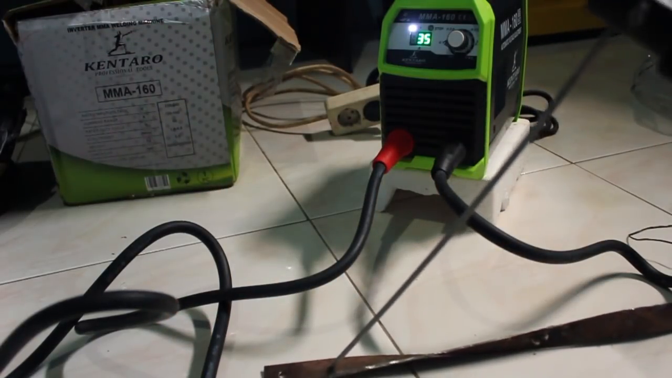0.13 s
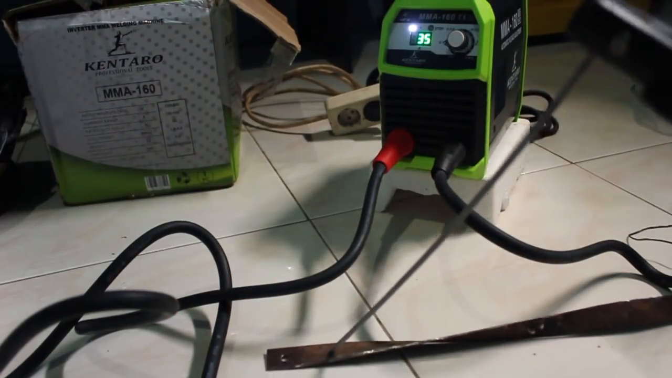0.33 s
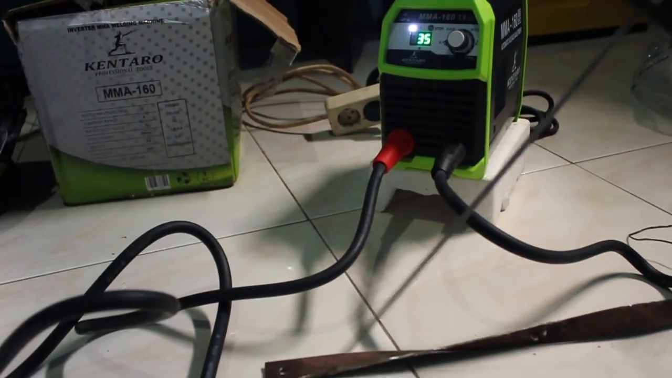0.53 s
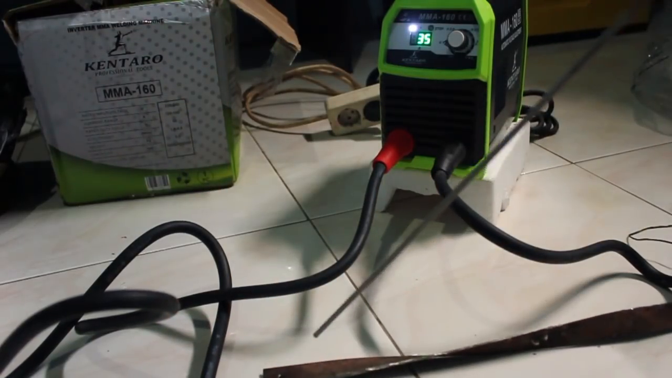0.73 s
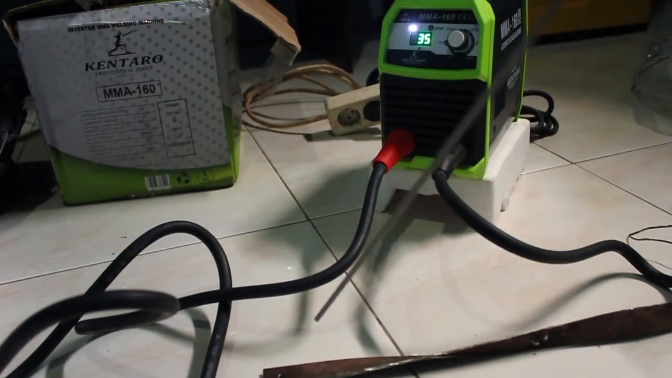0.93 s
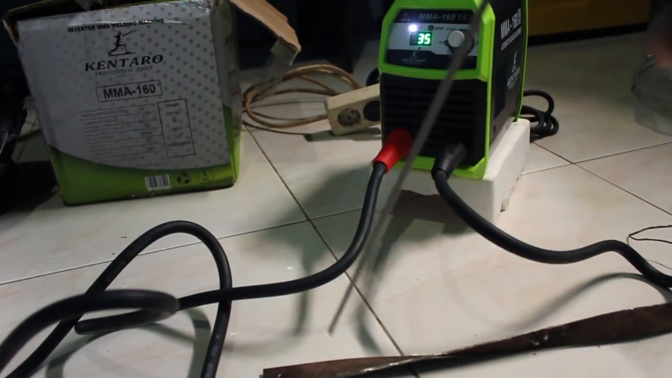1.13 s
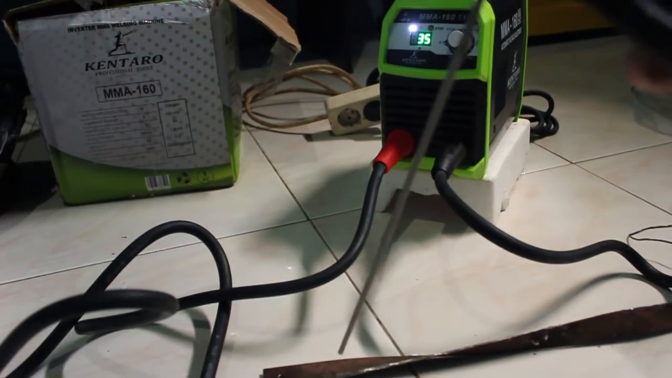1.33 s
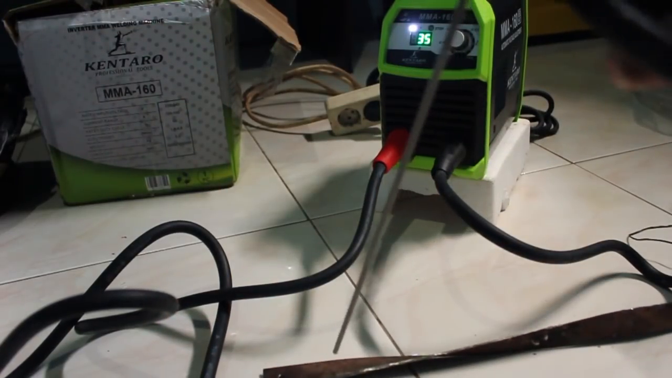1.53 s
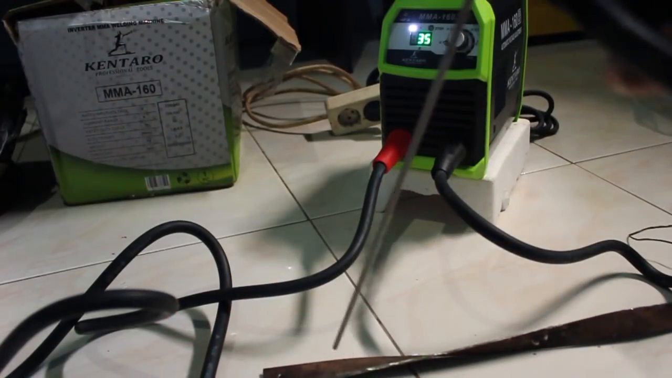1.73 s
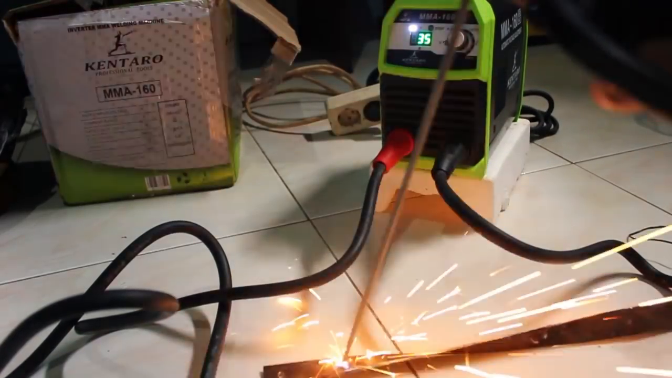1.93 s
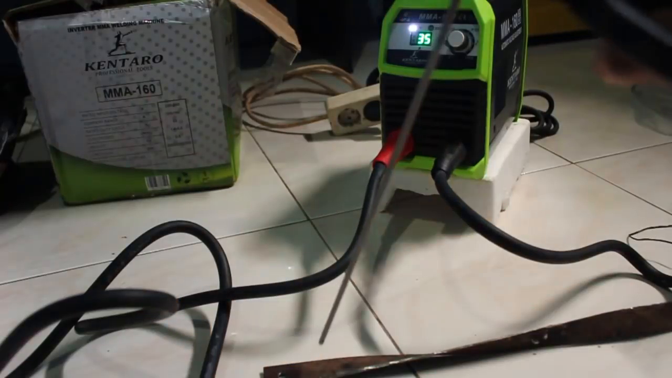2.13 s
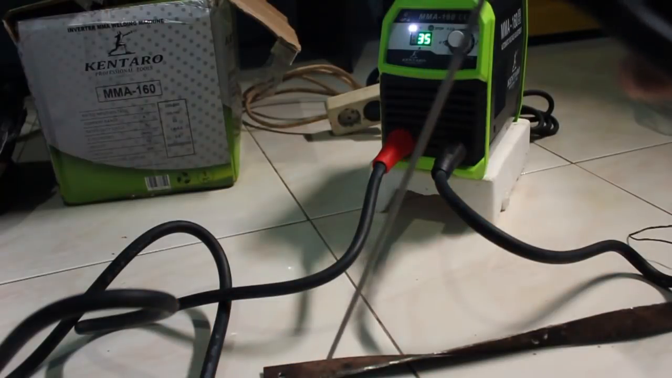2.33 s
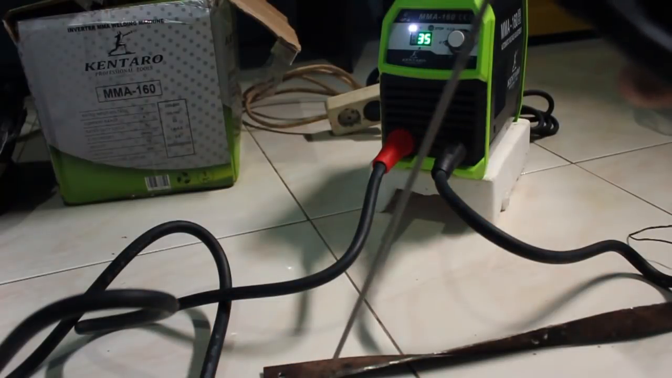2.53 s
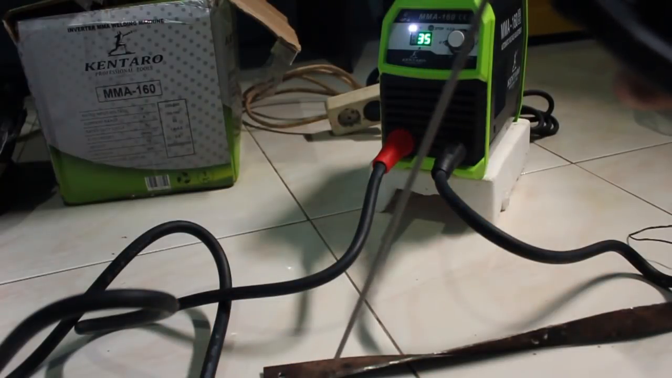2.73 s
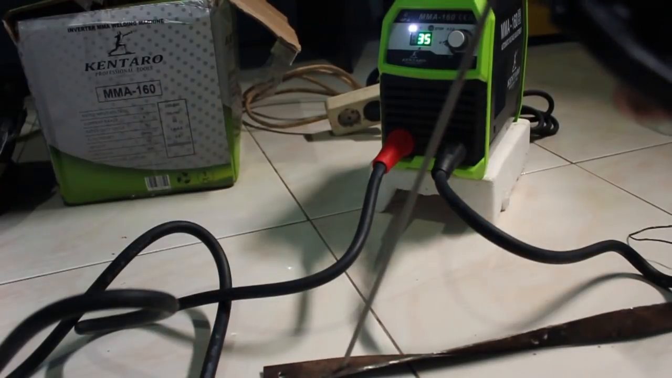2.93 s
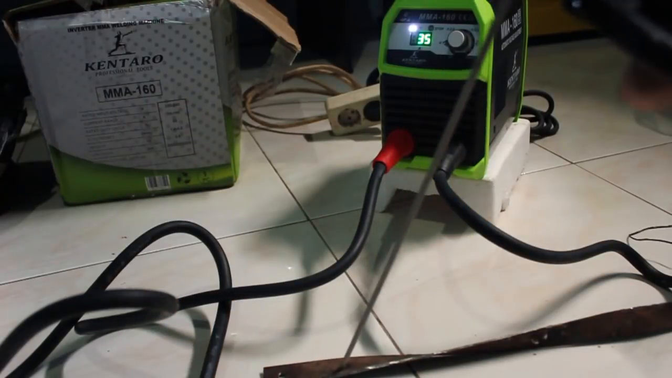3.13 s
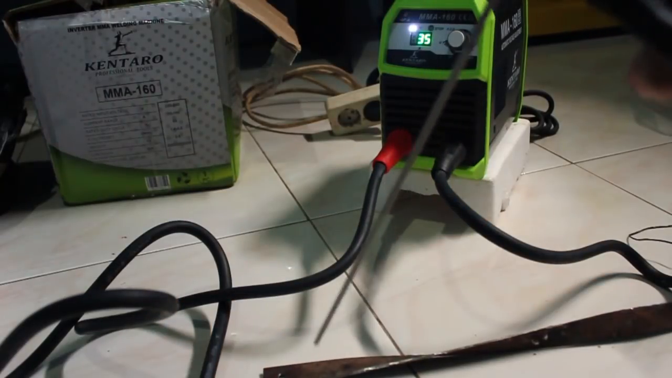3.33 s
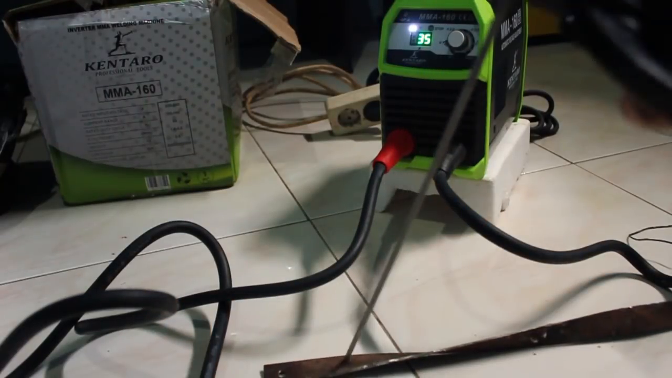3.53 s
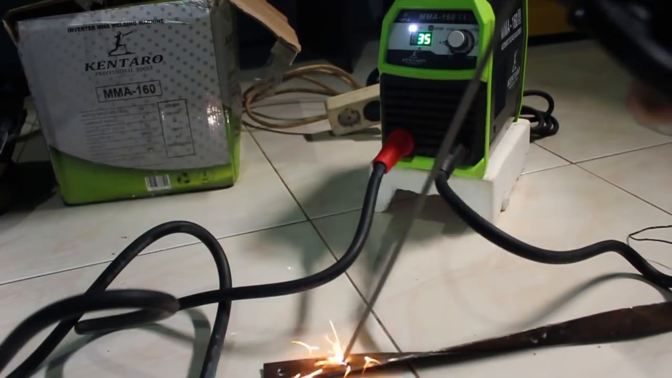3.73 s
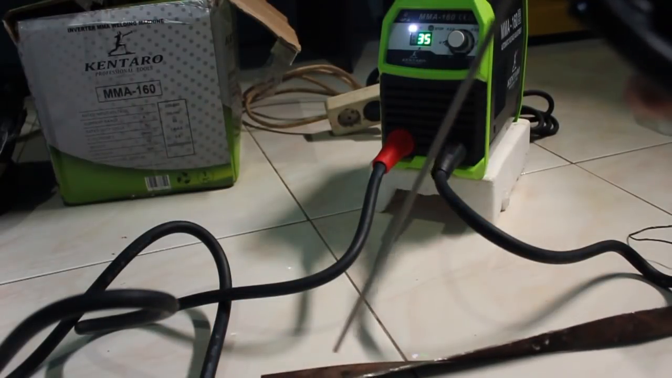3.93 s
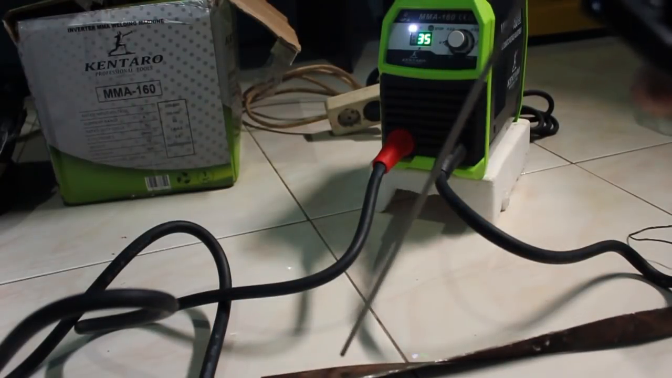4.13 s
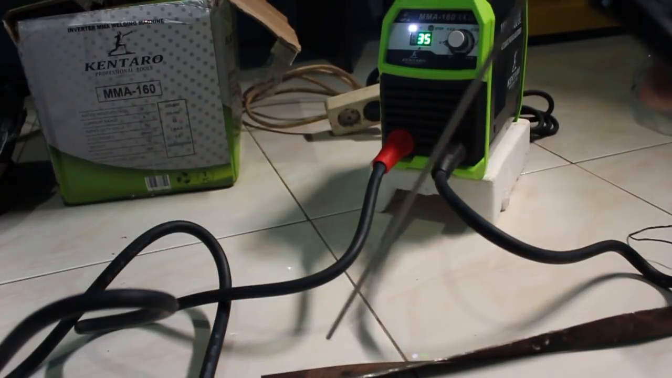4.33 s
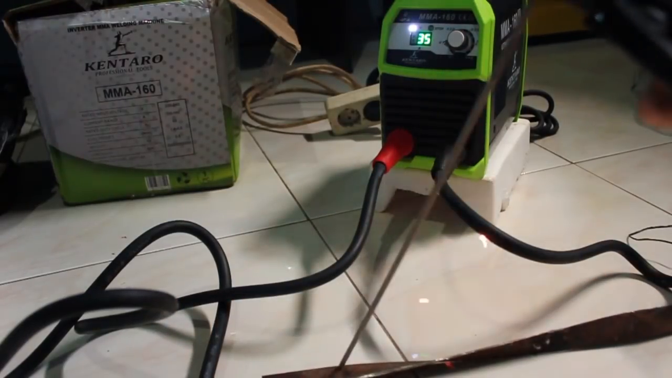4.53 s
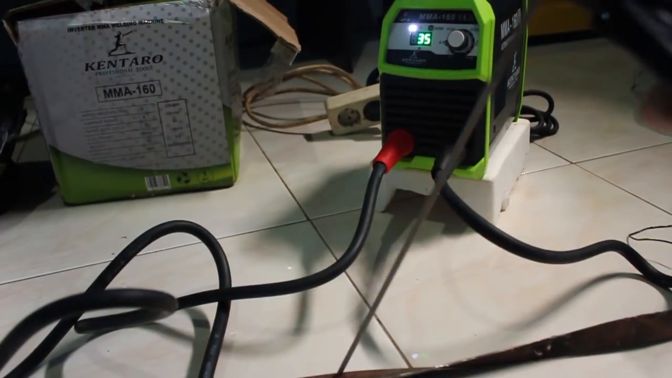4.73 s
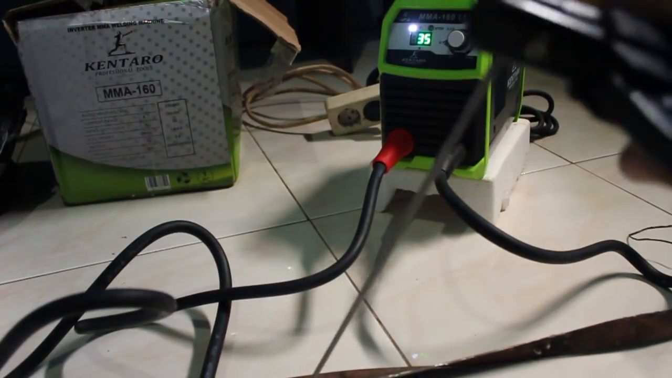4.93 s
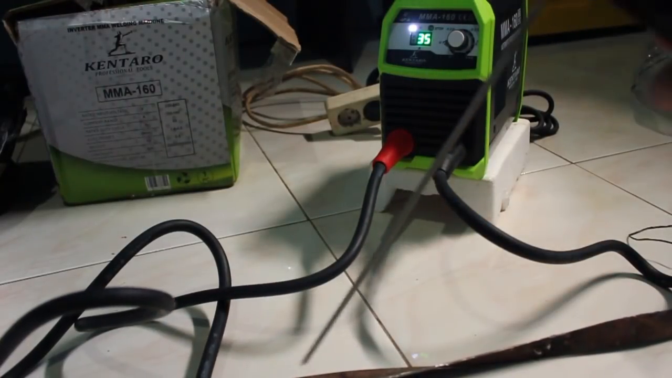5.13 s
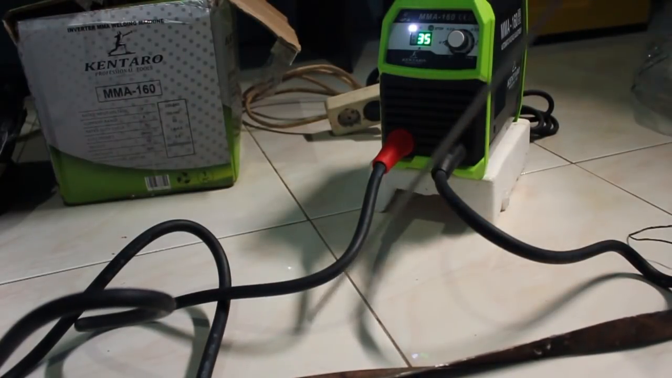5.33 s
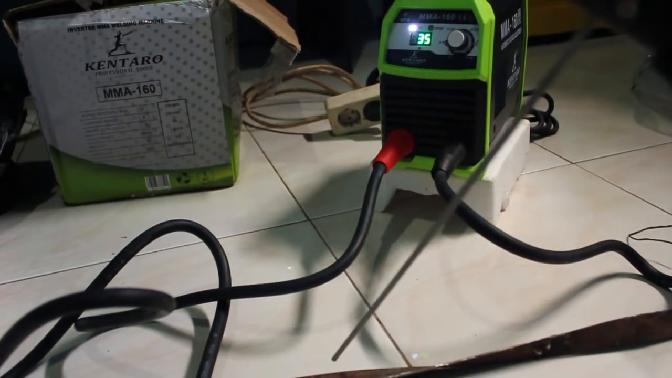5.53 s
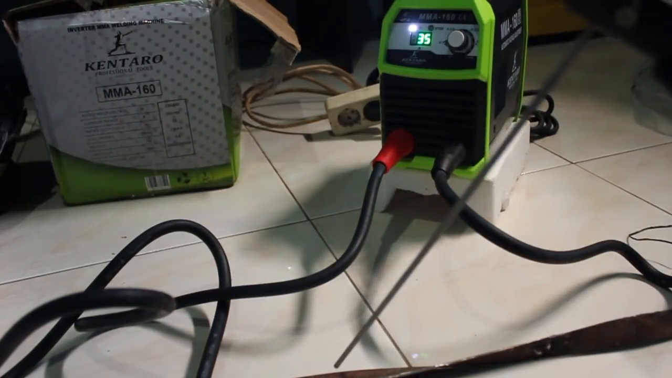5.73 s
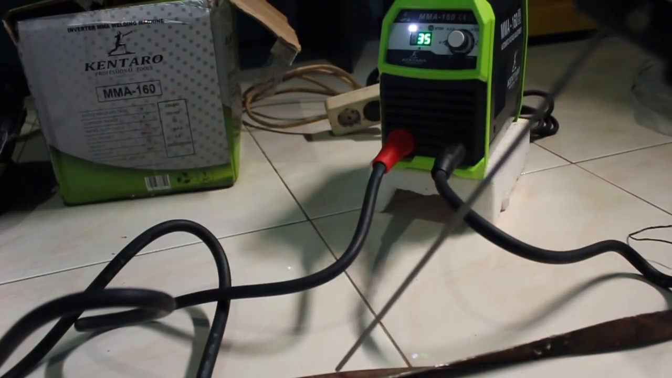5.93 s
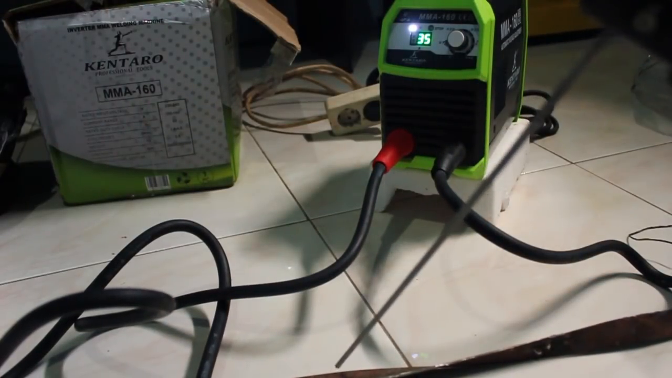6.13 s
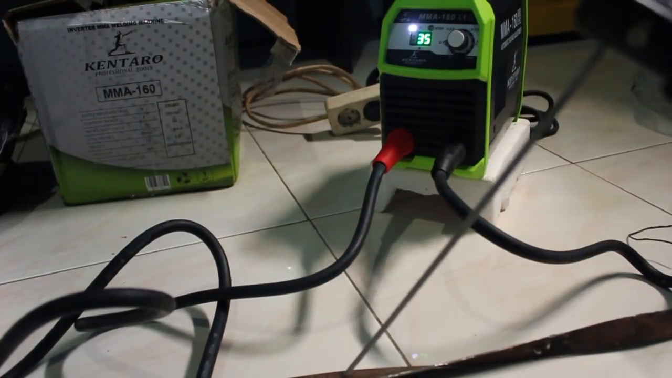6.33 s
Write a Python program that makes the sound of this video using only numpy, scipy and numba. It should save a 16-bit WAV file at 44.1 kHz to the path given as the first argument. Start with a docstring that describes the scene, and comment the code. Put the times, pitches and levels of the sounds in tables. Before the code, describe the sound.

Steady fan whine and airflow, a faint distant horn toot, then bright metallic ticks, scrapes and two sudden bursts of loud electric arc crackling indoors.

```python
"""Welding rod tapped beside an idling inverter welder

The welder's fan whines in tones locked to its shaft and blows shaped noise across casing hollows.
A rod taps and drags on a steel bar: random contacts click, clatter and ring the steel's modes.
A few touches strike a short arc: spiky noise bursts crack, gritty noise sizzles, the tiled room echoes.
A horn of a few harmonics toots briefly far away.
A mono microphone with gain control ducks when the level is high."""
import sys
import numpy as np
from scipy import signal
from scipy.fft import rfft, irfft
from scipy.io import wavfile
from numba import njit

SR = 44100
rng = np.random.default_rng(int(sys.argv[2]) if len(sys.argv) > 2 else 0)


def bounce(signal):
    """Save signal as a 16-bit WAV file at the path given by the first command-line argument."""
    frames = np.transpose(np.atleast_2d(signal))
    limited = np.clip(frames, -1, 1)
    pcm = np.round(limited * 32767).astype(np.int16)
    wavfile.write(sys.argv[1], SR, pcm)


def elevation(decibels):
    """Turn decibel levels (scalar or array-like) into linear amplitude ratios."""
    levels = np.asarray(decibels, float)
    return 10 ** (levels / 20)


N = 284886


def rms_one(x):
    """Scale to rms 1."""
    return x / np.sqrt(np.mean(x ** 2) + 1e-20)


def at_hz(points, hz):
    """Interpolate a (hz, value) table on a log-frequency axis."""
    table_hz, values = np.transpose(points)
    return np.interp(np.log(hz), np.log(table_hz), values)


def band(x, low_hz, high_hz):
    """Gentle Butterworth band-pass."""
    edges_hz = [low_hz, min(high_hz, 0.45 * SR)]
    return signal.sosfilt(signal.butter(2, edges_hz, "band", fs=SR, output="sos"), x)


def drift(rate_hz):
    """Slow random wander of rms 1: noise through two equal poles, computed every 40 samples."""
    r = np.exp(-80 * np.pi * rate_hz / SR)
    noise = rng.standard_normal(N // 40 + 2002)
    slow = signal.lfilter([1], [1, -2 * r, r * r], noise)[2000:]   # skip the settling
    return np.interp(np.arange(N) / 40, np.arange(len(slow)), rms_one(slow))


def resonate(x, hz, width_hz):
    """Two-pole resonance, peak gain about 1."""
    r = np.exp(-np.pi * width_hz / SR)
    poles = [1, -2 * r * np.cos(2 * np.pi * hz / SR), r * r]
    return signal.lfilter([(1 - r * r) / 2, 0, (r * r - 1) / 2], poles, x)


# rod on bar: start_s, blow_db, drag_s (0 = no drag), ring_db, spot_hz (pitch favoured by the spot struck)
ROD_TAPS = [(1.646, -8.5, 0, -17.5, 4950), (2.915, -17, 0.00046, -15.5, 4950),
            (3.047, -39, 0.00043, -13, 8880), (3.4992, -8.5, 0.086, -17.5, 4900),
            (3.756, -12, 0.065, -12.5, 4900), (3.891, -5, 0.037, -15, 3360),
            (4.203, -8, 0.001, -14.5, 5950), (4.913, -24.5, 0.00073, -15, 7420),
            (5.02, -24.5, 0.0033, -15, 10200), (6.236, -17, 0.022, -12, 4930)]
# modes of rod and bar together: mode_hz, level_db, t60_s
STEEL_MODES = [(3000, 2, .03), (3359, -4, .1), (4673, -4, .08), (4759, -5, .1), (4893, -5, .1),
               (4960, -4, .09), (5954, -5, .07), (6239, -5, .09), (6500, -7, .09), (6874, -7, .1),
               (7424, -4, .12), (8193, -7, .09), (8877, -5, .12), (9399, -8, .09), (9857, -4, .06),
               (10170, -4, .11), (10650, -4, .1), (11180, -5, .11), (11640, -5, .08), (11820, -6, .1),
               (12320, -6, .09), (12620, -6, .12), (13180, -6, .09), (13850, -5, .12), (14260, -5, .12),
               (14870, -5, .09)]
CLICK_DB, DRAG_DB = -1, -29
CLATTER_DB, CLATTER_T60_S = -10, 0.065
CONTACT_LOW_HZ, CONTACT_HIGH_HZ = 2170, 13700
HARDEST_S = 0.0018   # hardest touch, after the tap starts
DRAG_RING_SHARE = 0.49   # share of the drag that feeds the modes
FAVOURED_DB, FAVOURED_LOG_WIDTH = 5, 0.03   # lift of modes near spot_hz


def ring_steel(strike, ring_db, spot_hz):
    """Decaying modes of the steel, those near the struck spot's pitch lifted."""
    out = np.zeros(len(strike))
    for mode_hz, level_db, t60_s in STEEL_MODES:
        r = elevation(-60 / (t60_s * SR))
        w = 2 * np.pi * mode_hz / SR
        favoured_db = FAVOURED_DB * np.exp(-(np.log(mode_hz / spot_hz) / FAVOURED_LOG_WIDTH) ** 2)
        luck_db = 2 * rng.standard_normal()
        ring = signal.lfilter([0, np.sin(w)], [1, -2 * r * np.cos(w), r * r], strike)
        out += elevation(ring_db + level_db + favoured_db + luck_db) * rng.choice([-1, 1]) * ring
    return out


def taps():
    """The rod chatters for a few ms, may drag on; contacts click, clatter and ring the steel."""
    out, t = np.zeros(N + SR), np.arange(SR // 3) / SR
    for start_s, blow_db, drag_s, ring_db, spot_hz in ROD_TAPS:
        grains = (2 * rng.random(len(t)) - 1) * (rng.random(len(t)) < 0.5)
        chatter = elevation(blow_db) * np.minimum(t / 0.002, 1) * np.exp(-t / 0.003)
        drag = (drag_s > 0) * elevation(DRAG_DB) / (1 + np.exp(np.minimum((t - drag_s) / 0.0032, 50)))
        contact = grains * (chatter + drag) + 1e-18
        blow = elevation(blow_db) * (np.arange(len(t)) == round(HARDEST_S * SR))
        strike = blow + DRAG_RING_SHARE * grains * drag + 1e-18
        # many close high overtones blur into decaying noise
        overtones = elevation(CLATTER_DB - 60 * t / CLATTER_T60_S) * rng.standard_normal(len(t))
        clatter = signal.fftconvolve(contact, overtones)[:len(t)]
        sound = band(elevation(CLICK_DB) * contact + clatter, CONTACT_LOW_HZ, CONTACT_HIGH_HZ)
        sound += ring_steel(strike, ring_db, spot_hz)
        at = round(start_s * SR)
        out[at:at + len(t)] += sound
    return out[:N]


# cracks of the arc: start_s, onset_db, low_hz, high_hz
ARC_CRACKS = [(1.8732, -9, 3000, 15000), (1.8759, 6, 2500, 6430), (1.8839, 2.5, 900, 3950),
              (1.8985, 10.5, 1200, 12100), (1.9043, 3, 990, 12000), (1.9065, -10, 4000, 15000),
              (1.913, 2, 6000, 15000), (1.961, 10, 2530, 16300), (3.5012, -11.5, 2200, 5430),
              (3.757, -7, 800, 9000), (3.7794, -8.5, 1010, 8000), (3.884, -25, 9000, 15500),
              (4.464, -11, 2000, 12000), (4.4679, 4.5, 2500, 15000), (4.4763, 5, 3000, 15000),
              (4.4827, -2, 2000, 14000), (4.494, 11.5, 1020, 11100), (4.5028, 6.5, 1500, 15000),
              (4.7926, -7, 11100, 17200), (4.802, -19, 11000, 17000)]
# the arc catches with a pop and a thud of air pushed away: start_s, pop_onset_db, thud_onset_db, thud_low_hz
ARC_STRIKES = [(1.8756, 5.5, -14, 24), (4.467, 2.5, -16, 220)]
# one row, droplets bursting at random: from_s, to_s, count, mean_db, low_hz
DROPLET_SPATTER = (1.954, 1.970, 8, -1, 3500)
CRACK_T60_S, CRACK_CYCLES = 0.0041, 11.8   # t60 = CRACK_T60_S + CRACK_CYCLES / low_hz
POP_LOW_HZ, POP_HIGH_HZ, POP_T60_S = 674, 1840, 0.012
THUD_DELAY_S, THUD_HIGH_HZ, THUD_T60_S = 0.00087, 800, 0.12
SPIKY_DB = 0.5   # random spread of the noise strength


def sparks():
    """Cracks, droplets, pops and thuds: band-passed noise, a pressure step first, then a decay."""
    out, t = np.zeros(N), np.arange(6000) / SR
    from_s, to_s, count, mean_db, drop_low_hz = DROPLET_SPATTER
    cracks = list(ARC_CRACKS)
    for when, size in rng.random((count, 2)):
        cracks.append((from_s + (to_s - from_s) * when, mean_db + 12 * (size - 0.5), drop_low_hz, 15000))
    bursts = [(s, db, CRACK_T60_S + CRACK_CYCLES / low, low, high) for s, db, low, high in cracks]
    for s, pop_db, thud_db, thud_low_hz in ARC_STRIKES:
        bursts.append((s, pop_db, POP_T60_S, POP_LOW_HZ, POP_HIGH_HZ))
        bursts.append((s + THUD_DELAY_S, thud_db, THUD_T60_S, thud_low_hz, THUD_HIGH_HZ))
    for start_s, onset_db, t60_s, low_hz, high_hz in bursts:
        spikes = rng.standard_normal(len(t)) * elevation(SPIKY_DB * rng.standard_normal(len(t)))
        spikes[0] = 3.0 + abs(spikes[0])   # pressure step as the gap breaks down
        burst = band(spikes * elevation(-60 * t / t60_s), low_hz, high_hz)
        # onset power of an ideal decay with the same energy
        onset_power = np.sum(burst ** 2) / (t60_s * SR / (2 * np.log(1000)))
        at = round(start_s * SR)
        out[at:at + len(t)] += elevation(onset_db) * burst / np.sqrt(onset_power)
    return out


# the arc burns: start_s, end_s, level_db (rms), high_hz
ARC_BURNS = [(1.874, 1.915, -14, 8000), (3.757, 3.80, -22, 10000), (4.465, 4.51, -14, 10000)]
ARC_LOW_HZ, ARC_RISE_S, ARC_FALL_S = 690, 0.00067, 0.004
COOLING_DB, COOLING_T60_S, COOLING_LOW_HZ = -4, 0.41, 5000   # level against the arc's


def arc():
    """The burning arc sizzles: gritty noise of jumping strength; then hot slag hisses and fades."""
    out, t = np.zeros(N), np.arange(N) / SR
    grit_db = 4.0 * rng.standard_normal(N) + 2.5 * drift(200)
    grit = rng.standard_normal(N) * elevation(grit_db)
    hiss = rms_one(band(rng.standard_normal(N), COOLING_LOW_HZ, 16000))
    for start_s, end_s, level_db, high_hz in ARC_BURNS:
        burning = np.interp(t, [start_s, start_s + ARC_RISE_S, end_s - ARC_FALL_S, end_s], [0, 1, 1, 0])
        out += elevation(level_db) * burning * rms_one(band(grit, ARC_LOW_HZ, high_hz))
        cooling_db = level_db + COOLING_DB - 60 * np.abs(t - end_s) / COOLING_T60_S
        out += elevation(cooling_db) * (t > end_s) * hiss
    return out


# decay of the tiled room: pitch_hz, t60_s
ROOM_DECAY = [(300, 0.58), (1000, 0.37), (3000, 0.53), (8000, 0.25), (15000, 0.35)]
ROOM_DB, ROOM_BUILD_S = -5.5, 0.015


def room(x):
    """Echo tail of the tiled room: noise that builds up and dies, octave by octave."""
    t = np.arange(SR // 2) / SR
    white = rng.standard_normal((2, len(t)))   # neighbouring octaves get unrelated noise
    tail = np.zeros(len(t))
    for k in range(7):
        low_hz = 125 * 2.0 ** k
        t60_s = at_hz(ROOM_DECAY, np.sqrt(2) * low_hz)
        tail += band(white[k % 2], low_hz, 2 * low_hz) * elevation(-60 * t / t60_s)
    tail *= 1 - np.exp(-(t / ROOM_BUILD_S) ** 2)
    return elevation(ROOM_DB) * signal.fftconvolve(x, tail / np.sqrt(np.sum(tail ** 2)))[:N]


SHAFT_HZ = 99.25
# tones of seven blades and a twelve-slot motor: shaft_multiple, level_db (rms)
FAN_TONES = [(7, -28), (12, -46), (14, -45.5), (21, -47), (24, -44.5), (28, -41.5), (35, -60), (42, -42),
             (49, -47.5)]


def fan_tones():
    """Blade and motor tones locked to the wavering shaft; levels of higher ones waver more."""
    shaft_hz = SHAFT_HZ * (1 + 0.00015 * drift(4.25))
    angle = 2 * np.pi * np.cumsum(shaft_hz) / SR
    out = np.zeros(N)
    for multiple, level_db in FAN_TONES:
        wavering_db = level_db + 0.24 * np.sqrt(multiple) * drift(6.4)
        out += np.sqrt(2) * elevation(wavering_db) * np.sin(multiple * angle + 2 * np.pi * rng.random())
    return out


# airflow spectrum shape: pitch_hz, density_db (per Hz, relative)
AIRFLOW_SHAPE = [(25, -25), (60, -31), (100, -22), (160, -20.5), (300, -10.5), (600, -8), (800, -13),
                 (1500, -12), (2500, -13.5), (4500, -15.5), (6200, -19), (7500, -26), (12000, -30),
                 (16000, -38)]
# casing hollows the airflow blows across: pitch_hz, width_hz (each of two passes), level_db (rms)
CASING_HOLLOWS = [(127.8, 9.7, -57), (217.7, 34, -46), (311.8, 46, -40), (452.3, 70, -34.5),
                  (500.7, 11, -42.5), (955.6, 46, -44.5), (1370, 24, -50), (2200, 180, -42.5),
                  (4900, 130, -49)]
AIRFLOW_DB, PULSE_DEPTH = -29, 0.026


def airflow():
    """Turbulence: coloured noise lightly pulsed at the mean shaft rate, plus hollows as resonant noise."""
    hz = np.maximum(np.arange(N // 2 + 1) * SR / N, 1)
    spectrum = rfft(rng.standard_normal(N)) * elevation(at_hz(AIRFLOW_SHAPE, hz))
    noise = rms_one(irfft(spectrum, N))
    pulsing = 1 + PULSE_DEPTH * np.sin(2 * np.pi * SHAFT_HZ * np.arange(N) / SR)
    out = elevation(AIRFLOW_DB + 0.53 * drift(3.9)) * pulsing * noise
    for hollow_hz, width_hz, level_db in CASING_HOLLOWS:
        once = resonate(rng.standard_normal(N), hollow_hz, width_hz)
        out += elevation(level_db) * rms_one(resonate(once, hollow_hz, width_hz))
    return out


# horn overtones: pitch_multiple, level_db (against HIGH_DB)
HORN_PARTIALS = [(2, 0), (3, -10), (4, -5), (6, -17), (8, -14)]
HORN_HZ, HORN_SWELL_DB_PER_S, HORN_FADE_DB_PER_S = 921, 330, 300
LOW_PEAK_S, LOW_DB = 0.378, -26.5   # fundamental, rms at its loudest
HIGH_PEAK_S, HIGH_DB = 0.365, -25   # overtones


def horn():
    """Short far toot of a buzzing diaphragm: harmonics, the overtones peaking before the fundamental."""
    t = np.arange(N) / SR
    angle = 2 * np.pi * HORN_HZ * t

    def swell(peak_s, peak_db):
        """Level rising to peak_s and falling after it, both linear in dB."""
        down_db = np.maximum(HORN_SWELL_DB_PER_S * (peak_s - t), HORN_FADE_DB_PER_S * (t - peak_s))
        return np.sqrt(2) * elevation(peak_db - down_db)

    overtones = sum(elevation(level_db) * np.sin(k * angle) for k, level_db in HORN_PARTIALS)
    return swell(LOW_PEAK_S, LOW_DB) * np.sin(angle) + swell(HIGH_PEAK_S, HIGH_DB) * overtones


def scene():
    """Taps, sparks and arc with their echo, over fan and horn; the same in both channels."""
    blows = taps() + sparks() + arc()
    mono = blows + room(blows) + fan_tones() + airflow() + horn()
    return np.tile(mono, (2, 1))


@njit
def follow(wanted_db, fall, rise):
    """One-pole gain follower in dB with separate fall and rise rates per sample."""
    out, db = np.empty_like(wanted_db), 0.0
    for i in range(len(wanted_db)):
        db += (wanted_db[i] - db) * (fall if wanted_db[i] < db else rise)
        out[i] = db
    return out


def top_cut(x):
    """Nothing passes above the cut-off."""
    return signal.sosfilt(signal.butter(12, 16420, fs=SR, output="sos"), x)


DUCK_ABOVE_DB, DUCK_RATIO = -18.5, 1.423   # dB of ducking per dB above
DETECT_S, DUCK_S, RECOVER_S = 0.017, 0.017, 0.16   # time constants
LOW_CUT_HZ, HIGH_CUT_HZ = 44, 16200


def record(dry):
    """Gain control falls fast and recovers slowly, peaks clip, top and bottom are cut."""
    r = np.exp(-1 / (DETECT_S * SR))
    level = np.sqrt(signal.lfilter([1 - r], [1, -r], dry[0] ** 2) + 1e-12)
    wanted_db = DUCK_RATIO * np.minimum(0, DUCK_ABOVE_DB - 20 * np.log10(level))
    gain = elevation(follow(wanted_db, 1 / (DUCK_S * SR), 1 / (RECOVER_S * SR)))
    clipped = np.clip(dry * gain, -1, 1)
    cut = signal.sosfilt(signal.cheby2(8, 25, HIGH_CUT_HZ, fs=SR, output="sos"), clipped)
    cut = signal.sosfilt(signal.butter(2, LOW_CUT_HZ, "high", fs=SR, output="sos"), cut)
    return top_cut(cut)


dry = scene()
out = record(dry)
bounce(out)
```